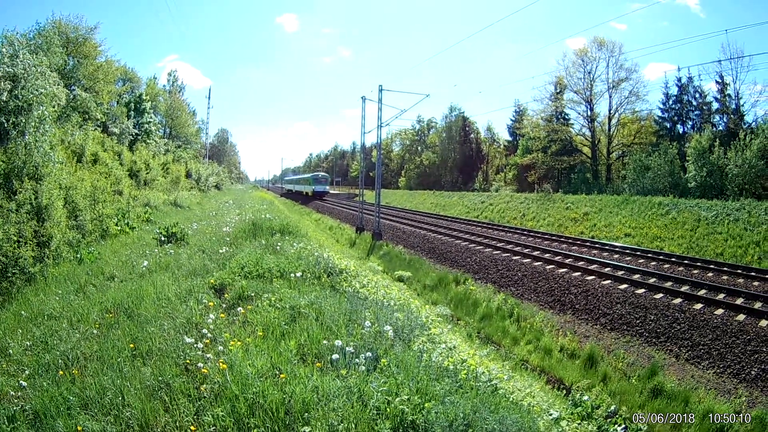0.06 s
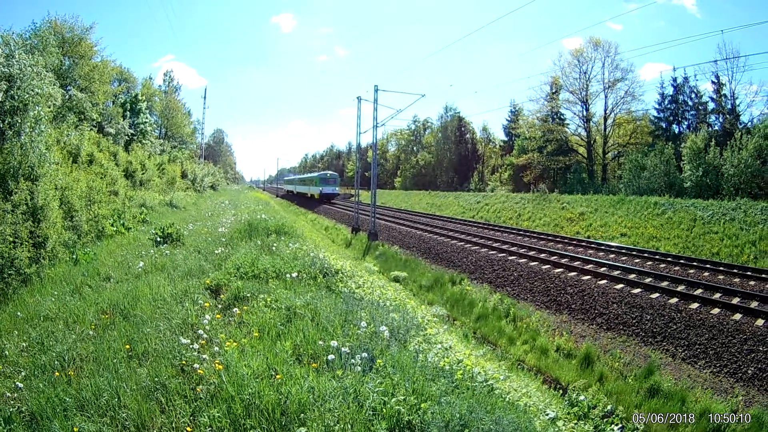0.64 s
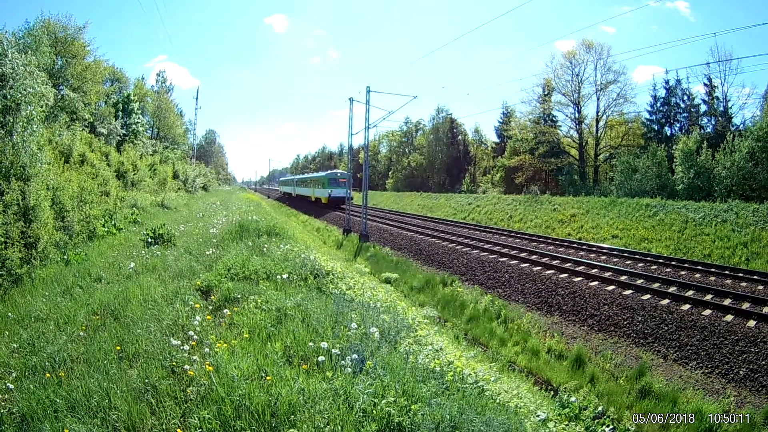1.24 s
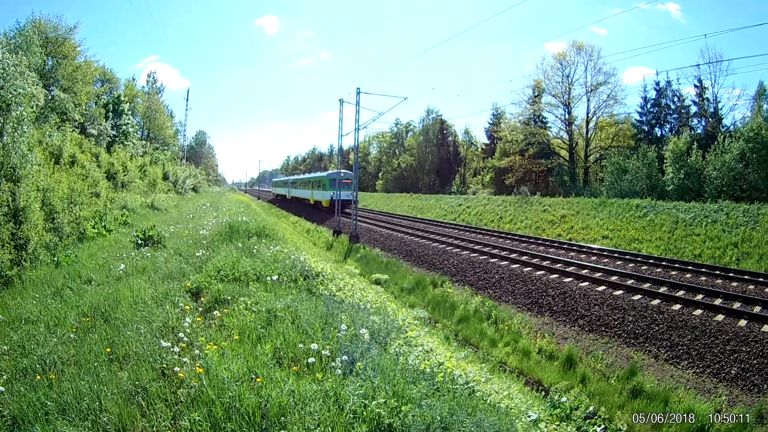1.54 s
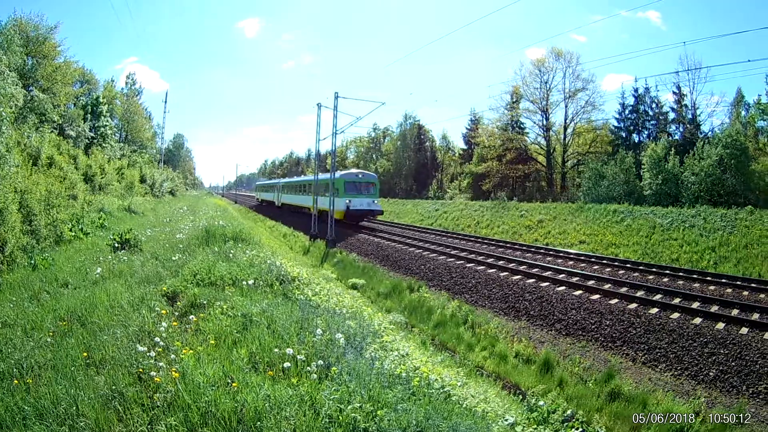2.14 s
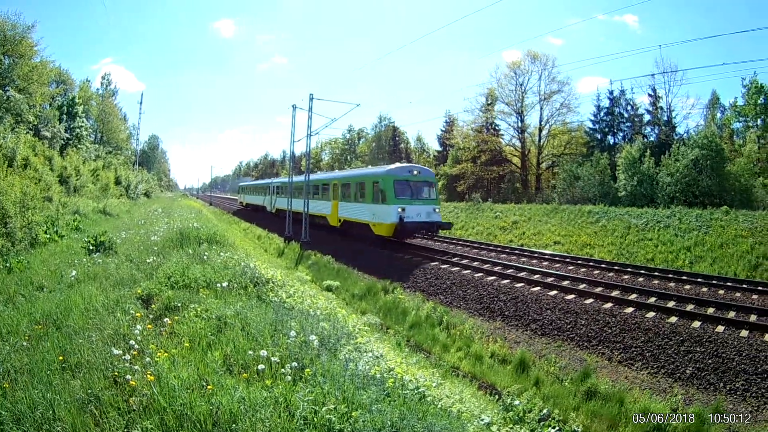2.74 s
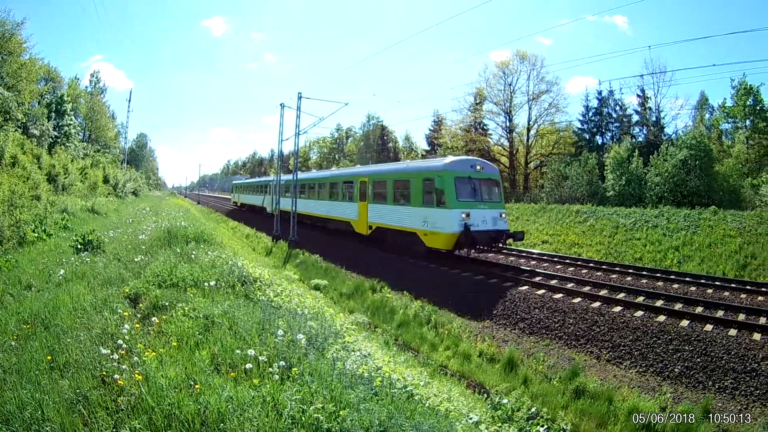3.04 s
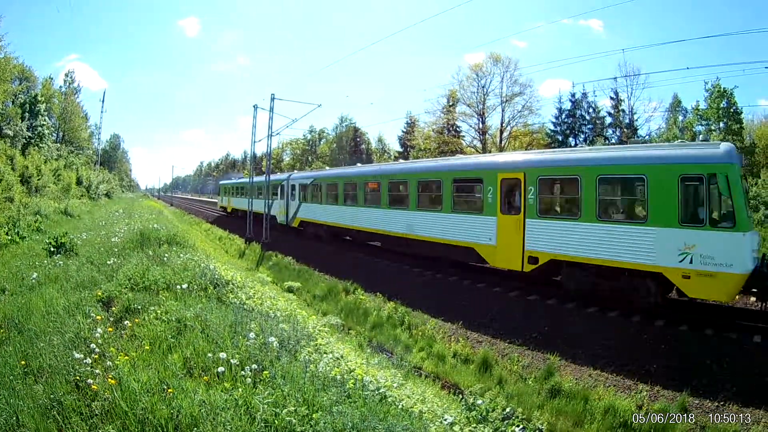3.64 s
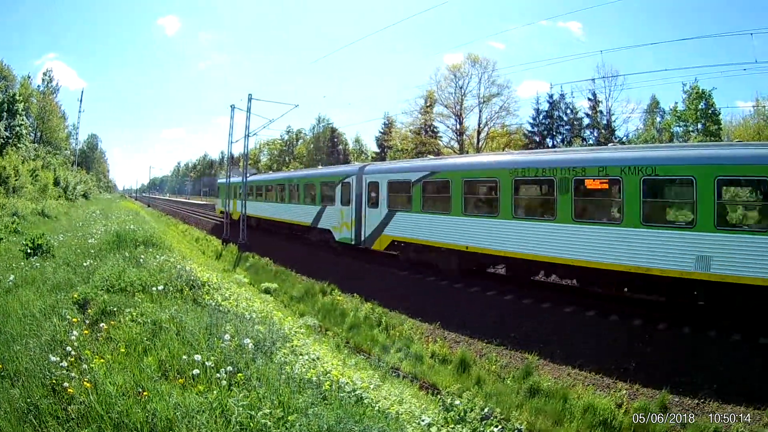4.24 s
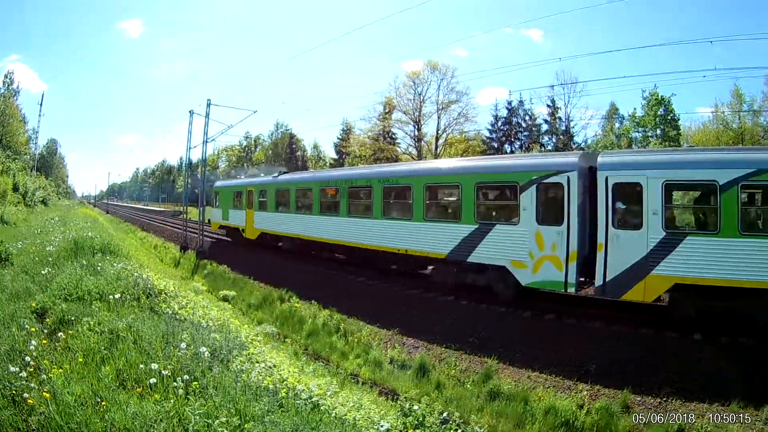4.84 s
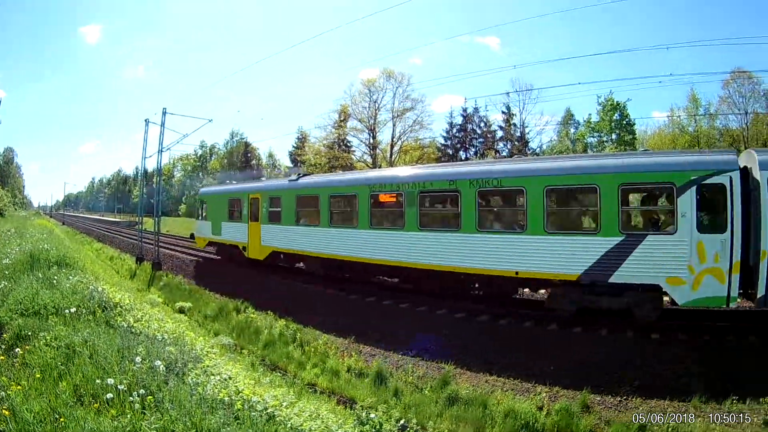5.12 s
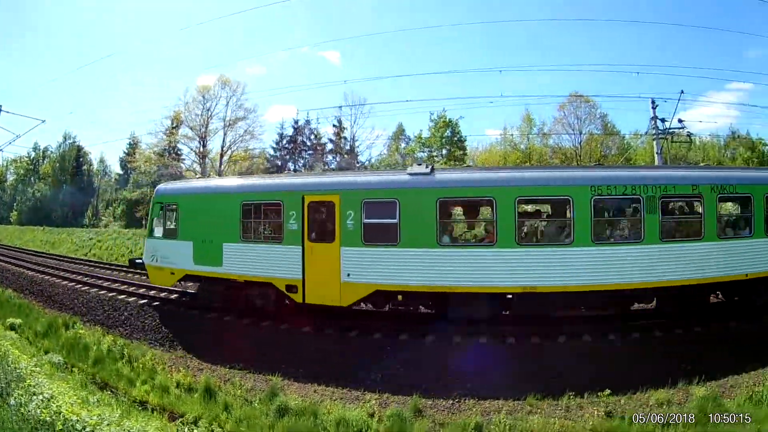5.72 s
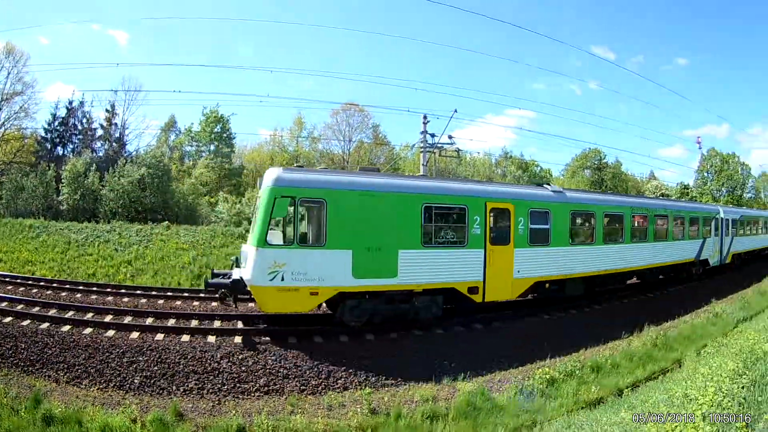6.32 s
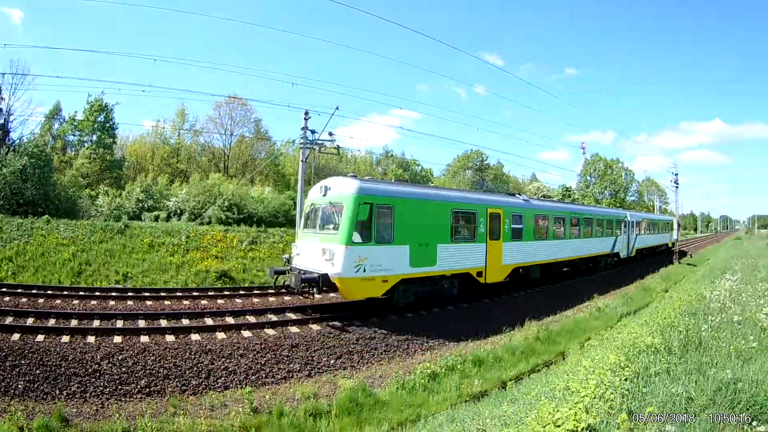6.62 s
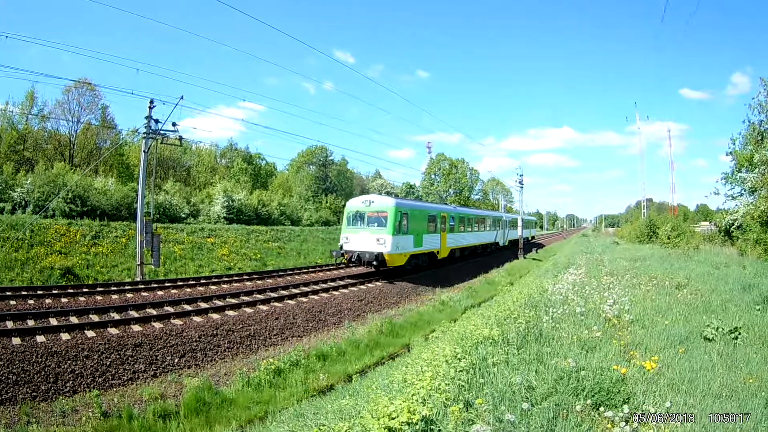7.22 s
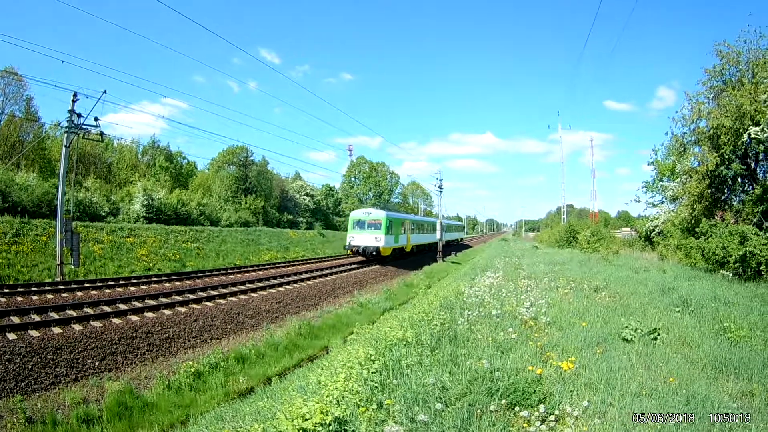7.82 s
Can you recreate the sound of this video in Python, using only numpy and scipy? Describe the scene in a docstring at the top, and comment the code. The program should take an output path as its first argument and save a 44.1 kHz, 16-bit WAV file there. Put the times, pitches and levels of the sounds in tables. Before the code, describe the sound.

A two-car diesel train approaches and passes close by, wheels roaring on the rails and engines droning and rattling, then fades away.

```python
"""On open track, a two-car diesel railcar passes close by at an even speed. Each car has a six-cylinder engine:
the two drones sink in pitch one after the other and beat together. Steel wheels roar and ring on the rails,
sleepers and car bodies rumble, grit hisses at the contact. The front engine ticks once a turn, the rear one
rattles six times a turn, and a rush of cooling air follows each. A low breeze lies under it all."""
import sys
import numpy as np
from scipy import signal
from scipy.fft import rfft, irfft, next_fast_len
from scipy.io import wavfile

SR = 44100
rng = np.random.default_rng(int(sys.argv[2]) if len(sys.argv) > 2 else 0)


def to_wav(s):
    """Save 16-bit WAV."""
    ch = np.atleast_2d(s).T  # columns
    pcm = np.round(np.clip(ch, -1, 1) * 32767)  # PCM
    wavfile.write(sys.argv[1], SR, pcm.astype(np.int16))


N = 355887
T = np.arange(N) / SR
TRAIN_M_S, SOUND_M_S = 16.266, 343

# the engines: (time abreast [s], shaft speed [Hz], distance from the microphone [m])
FRONT, REAR = (4.2825, 17.652, 11.54), (5.901, 18.3782, 9.14)
# swells and lulls of the running gear: (time [s], half length [s], roar [dB], rumble [dB], hiss [dB])
GEAR_SWELLS = [(1.0, .55, 1.2, 0, 0), (3.8, .25, .7, 3.0, 2.5), (4.82, .12, .3, 3.5, 0),
               (4.98, .09, -1.6, -2.0, -.5), (5.24, .09, 1.0, 0, 0), (5.62, .15, 1.0, 5.0, .5),
               (6.25, .18, 0, 0, 2.5), (7.05, .25, 1.5, 3.0, 1.0)]


def amp(db):
    """Decibels to gain."""
    return np.exp(np.asarray(db) * (np.log(10) / 20))


def unit(x):
    """Scales to rms 1."""
    return x / np.sqrt(np.mean(x ** 2) + 1e-20)


def colour(x, points):
    """Filters by an EQ curve drawn on a log-frequency axis."""
    hz, db = np.transpose(points)
    size = next_fast_len(N, True)
    bins = np.fft.rfftfreq(size, 1 / SR)
    gain = amp(np.interp(np.log(bins + 1), np.log(hz + 1), db))
    return irfft(rfft(x, size) * gain, size)[:N]


def noise(points):
    """Noise of rms 1 with the given spectrum."""
    return unit(colour(rng.standard_normal(N), points))


def wander(rate_hz):
    """Smooth random drift of rms 1, up to about the given rate."""
    size = 4096
    bins = np.fft.rfftfreq(size, T[-1] / size)
    slow = irfft(rfft(rng.standard_normal(size)) / (1 + (bins / rate_hz) ** 2))
    return np.interp(T, np.linspace(0, T[-1], size), unit(slow))


def swell(at_s, half_s, t=T):
    """A bell-shaped fade from 0 to 1 and back."""
    return np.exp(-np.minimum(((t - at_s) / half_s) ** 2, 20))


def swells(rows, column):
    """Gain from one dB column of a table of swells or dips."""
    t = T[::64]
    return np.interp(T, t, amp(sum(row[column] * swell(row[0], row[1], t) for row in rows)))


def passing(peak_s, reach_m, peak_db, ahead_db, behind_db):
    """Pass-by gain: each doubling of distance costs ahead_db coming and behind_db going."""
    doublings = np.log2(1 + (TRAIN_M_S * (T - peak_s) / reach_m) ** 2) / 2
    return amp(peak_db - doublings * np.where(T < peak_s, ahead_db, behind_db))


def rolling_gain():
    """Loudness of wheels on rails: one pass, with bumps and swells on top."""
    # pass-by: (time [s], reach [m], peak [dB], fall ahead [dB/doubling], fall behind [dB/doubling])
    rolling_pass = (5.27, 23.7, -16.2, 13.6, 14.4)
    # bumps over uneven rail: (time [s], lift [dB])
    rail_bumps = [(.9, 3.0), (1.39, 3.0), (2.83, 2.5), (2.915, 4.5), (2.975, 3.0), (3.195, 3.5),
                  (3.26, 3.5), (3.91, 3.5), (5.185, 1.5)]
    bumps = [(at_s, .017, db) for at_s, db in rail_bumps]
    return passing(*rolling_pass) * swells(bumps, column=2) * swells(GEAR_SWELLS, column=2)


def roar(flutter_db):
    """Rough steel rolls on steel; the colour turns as the cars show their front, side and back."""
    # the roar from four angles: (frequency [Hz], level [dB])
    far = [(210, -39), (350, -28.5), (430, -8.5), (522, -7.5), (604, 1), (686, -5.5), (742, 1), (802, -8.5),
           (1000, -6.5), (1140, -12), (1530, -13.5), (1870, -25), (2580, -33.5), (2880, -32), (3600, -50.5),
           (4680, -83), (7920, -120)]
    nearing = [(210, -44.5), (350, -24), (393, -10), (460, -6.5), (576, 3.5), (713, -3.5), (779, -0.5),
               (826, 0.5), (893, -0.5), (1070, -4), (1260, -4), (1370, -7.5), (1800, -13), (2280, -21.5),
               (3600, -38.5), (4680, -73), (7920, -120)]
    abreast = [(210, -66), (350, -20.5), (405, -5.5), (460, -6.5), (666, -1), (727, -0.5), (786, 0.5),
               (850, -4), (946, 1.5), (1000, -5), (1320, -2), (1510, -9.5), (1770, -6.5), (3020, -30),
               (3600, -40), (4680, -64), (7920, -120)]
    leaving = [(210, -44), (350, -15), (397, -18), (488, 1.5), (699, 0), (756, -3), (810, -1), (1020, -4.5),
               (1120, -2), (1480, -10.5), (1600, -5), (1970, -14), (2210, -15), (2820, -37), (3600, -30),
               (4680, -61), (7920, -120)]
    # crossfade points: (far [s], nearing [s], abreast from [s], abreast until [s], leaving [s])
    fade_times = [1.2, 3.9, 5.1, 5.9, 6.9]
    colours = [far, nearing, abreast, abreast, leaving]
    shares = [np.interp(T, fade_times, row) for row in np.eye(len(colours))]
    rolling = sum(np.sqrt(share) * noise(points) for share, points in zip(shares, colours))
    return rolling_gain() * amp(flutter_db * wander(18)) * rolling


def resonance(hz, width_hz):
    """A gliding resonance stirred at random, rms about 1."""
    sway = wander(width_hz / 2) + 1j * wander(width_hz / 2)
    return (sway * np.exp(2j * np.pi * np.cumsum(hz) / SR)).real


def wheel_ring(abreast_s, sweep_s, swell_db, whine_db, whine_width_hz):
    """Wheels and rails ring, sinking in pitch as they go by; a thin whine rises and falls."""
    # wheel and rail modes at rest: (frequency [Hz], width [Hz], level against the roar [dB])
    modes = [(588.7, 61, -16.5), (1726, 56, -34), (2740, 150, -37.5)]
    # whine of the running gear: (time [s], pitch [Hz])
    whine_pitch = [(0, 730), (2, 767), (4, 781), (5.7, 806.4), (6.3, 788), (8.07, 765)]
    doppler = 1 - TRAIN_M_S / SOUND_M_S * (T - abreast_s) / np.hypot(T - abreast_s, sweep_s)
    ring = sum(amp(db + swell_db * wander(2)) * resonance(hz * doppler, width) for hz, width, db in modes)
    whine_hz = np.interp(T, *np.transpose(whine_pitch))
    fade = np.interp(T, [6.2, 7], [1, .2])
    whine = amp(whine_db) * fade * resonance(whine_hz, whine_width_hz)
    return rolling_gain() * (ring + whine)


def undercarriage(grit_db):
    """Sleepers and car bodies rumble; grit at the wheel contact hisses and, from close by, fizzes."""
    # low, high and top layers: (frequency [Hz], level [dB])
    rumble_eq = [(18, -34), (35, -9.5), (70, -1), (150, -7), (270, 0), (380, -3.5), (520, -1.5),
                 (1000, -61.5)]
    hiss_eq = [(2000, -36), (3100, 3.5), (4000, 4), (5400, 1), (6200, -4), (7200, -9), (8200, -17.5),
               (10000, -51.5)]
    fizz_eq = [(6500, -28), (8400, 1), (10000, 0.5), (11200, 0.5), (12300, -16), (13300, -27.5),
               (15000, -26), (16000, -21)]
    # pass-bys: (time [s], reach [m], peak [dB], fall ahead [dB/doubling], fall behind [dB/doubling])
    rumble_pass = (5.1, 26.7, -28.3, 18.3, 24.5)
    hiss_pass = (5.25, 15.5, -40.2, 15.2, 13.6)
    fizz_pass = (5.25, 17.0, -58.6, 16.3, 16.5)
    rumble = passing(*rumble_pass) * swells(GEAR_SWELLS, column=3) * noise(rumble_eq)
    grit = passing(*hiss_pass) * noise(hiss_eq) + passing(*fizz_pass) * noise(fizz_eq)
    return rumble + swells(GEAR_SWELLS, column=4) * amp(grit_db * wander(96)) * grit


def shaft(engine):
    """Shaft turns as heard after the travel time of sound, and nearness (1 when abreast)."""
    abreast_s, shaft_hz, gap_m = engine
    distance = np.hypot(gap_m, TRAIN_M_S * (T - abreast_s))
    return shaft_hz * (T - abreast_s - (distance - gap_m) / SOUND_M_S), gap_m / distance


def exhaust(engine, boom_pass, drone_pass, overtones, firing_db, waver_db, jitter_turns):
    """Firing note, boom and drone on multiples of the shaft speed, each wavering in the moving air."""
    # brief dips in the note: (time [s], half length [s], boom [dB], drone [dB])
    dips = [(2.4, .25, -2.5, 0), (3.05, .3, 0, -4.5), (4.19, .08, -10.0, 0), (4.62, .1, -5.0, -2.5),
            (5.3, .2, -5.0, -1.0), (5.73, .08, -3.0, 0), (6.27, .12, -3.0, 0), (6.92, .22, 0, -4.5)]
    turns, nearness = shaft(engine)
    turns = turns + jitter_turns * wander(5.5)
    firing = amp(firing_db) * nearness ** 0.95
    boom = passing(*boom_pass) * swells(dips, column=2)
    drone = passing(*drone_pass) * swells(dips, column=3)
    partials = [(3, firing), (6, boom), (12, drone)]
    partials += [(order, drone * amp(db)) for order, db in overtones]
    return np.sqrt(2) * sum(level * amp(waver_db * wander(1)) * np.cos(2 * np.pi * order * turns)
                            for order, level in partials)


def diesels():
    """Two exhausts at slightly different speeds beat against each other."""
    # pass-bys: (time [s], reach [m], peak [dB], fall ahead [dB/doubling], fall behind [dB/doubling])
    front_boom = (4.2, 11.5, -23.8, 6.9, 8.2)
    front_drone = (4.1, 12.5, -32.5, 8.7, 11.0)
    rear_boom = (5.6, 25.0, -28.0, 18.0, 9.0)
    rear_drone = (5.78, 11.5, -27.0, 11.3, 8.8)
    # other exhaust partials: (order [cycles per turn], level against the drone [dB])
    front_tones = [(6.5, -20.5), (7, -13), (8, -18.5), (9, -4.7), (10, -15), (13, -22.5), (15, -28),
                   (18, -22), (21, -16)]
    rear_tones = [(6.5, -14), (7, -8), (9, -11), (10, -14), (13, -12), (15, -12), (18, -13), (20, -16),
                  (22, -18), (24, -19)]
    front = exhaust(FRONT, front_boom, front_drone, front_tones,
                    firing_db=-36.3, waver_db=.6, jitter_turns=.0015)
    rear = exhaust(REAR, rear_boom, rear_drone, rear_tones,
                   firing_db=-43, waver_db=1.0, jitter_turns=.0017)
    return front + rear


def breeze(level_db):
    """A low, steady bed of open air."""
    # moving air: (frequency [Hz], level [dB])
    air_eq = [(15, -26), (38, 3), (70, 3), (150, -0.5), (320, -35.5), (1000, -50.5)]
    return amp(level_db) * noise(air_eq)


def ticking(tick_s, decay_s, floor):
    """The front engine's envelope: one sharp burst a turn, one of them peaking near tick_s."""
    turns = shaft(FRONT)[0]
    age = (turns - np.interp(tick_s - .003, T, turns)) % 1 / FRONT[1]
    onset = 1 - np.exp(-age / .0015)
    return unit(floor + onset * np.exp(-age / decay_s))


def rattle(decay_s):
    """The rear engine's envelope: injectors and valves knock six times a turn, unevenly."""
    count = 6 * shaft(REAR)[0]
    age = count % 1 / (6 * REAR[1])
    strong_weak = 1 + .25 * np.cos(np.pi * np.floor(count))
    onset = 1 - np.exp(-age / .0008)
    return unit(strong_weak * amp(1.3 * wander(40)) * onset * np.exp(-age / decay_s))


def clatter(front_sizzle_db, rear_sizzle_db):
    """Ticks and knocks ring the engine blocks; the rear one stays hidden until nearly abreast."""
    # ring of each block and the close-up sizzle: (frequency [Hz], level [dB])
    front_block = [(1500, -27.5), (3500, -14), (3900, 5), (4120, -2), (4370, 4), (4720, -5.5), (5050, 0),
                   (5600, -14), (6900, -12.5), (9000, -32), (14000, -52.5)]
    rear_block = [(1500, -25), (3550, -12), (4000, 0), (4230, 4), (4700, -2), (5400, -25), (6100, -9),
                  (7200, -15), (9000, -34), (12000, -48)]
    sizzle_eq = [(6000, -30), (7200, 6), (8600, -4), (9800, -11), (11300, -3), (12400, -8), (13400, -26),
                 (15000, -26), (16000, -40)]
    # pass-bys: (time [s], reach [m], peak [dB], fall ahead [dB/doubling], fall behind [dB/doubling])
    front_pass = (4.4, 4.9, -41.0, 11.0, 8.4)
    rear_pass = (5.58, 6.0, -36.0, 27.0, 9.3)
    ticks, knocks = ticking(tick_s=4.337, decay_s=0.013, floor=0.15), rattle(decay_s=0.0077)
    front = passing(*front_pass) * ticks * noise(front_block)
    rear = passing(*rear_pass) * knocks * noise(rear_block)
    # the top end only escapes straight out from under each car
    sizzle = amp(front_sizzle_db) * swell(4.4, .25) * ticks
    sizzle += amp(rear_sizzle_db) * swell(5.95, .45) * knocks
    return front + rear + sizzle * noise(sizzle_eq)


def ringing_parts():
    """Each bogie, and higher-pitched parts too, rings in its own band while it faces the microphone."""
    # ringing bands: (time [s], half length [s], frequency [Hz], width [Hz], level [dB])
    bogies = [(3.92, .06, 800, 130, -30.0), (4.822, .08, 890, 150, -24.5), (5.21, .082, 880, 200, -21.5),
              (6.03, .061, 807, 40, -19.5)]
    high_flares = [(4.24, .15, 1350, 300, -28.5), (5.15, .17, 5600, 550, -45.5),
                   (5.4, .31, 1760, 140, -26.5), (5.6, .3, 11500, 700, -60), (6.65, .2, 11900, 710, -73),
                   (6.8, .5, 4400, 380, -50.5), (7.204, .21, 1710, 150, -34)]
    ringing = np.zeros(N)
    for at_s, half_s, hz, width, db in [*bogies, *high_flares]:
        band = [(max(hz - 4 * width, 0), -120), (hz - width, -11), (hz, 0),
                (hz + width, -11), (hz + 4 * width, -120)]
        ringing += amp(db) * swell(at_s, half_s) * noise(band)
    return ringing


def fans(front_db, rear_db):
    """A rush of cooling air goes by with each engine."""
    # cooling fans close up: (frequency [Hz], level [dB])
    fan_eq = [(1200, -29), (2000, 0), (2700, 7), (3300, -1), (3900, -23), (6000, -49.5)]
    return (amp(front_db) * swell(4.56, 0.35) + amp(rear_db) * swell(5.85, 0.48)) * noise(fan_eq)


def scene():
    """The running gear, both engines and the open air, in mono."""
    wheels = roar(flutter_db=0.4) + undercarriage(grit_db=1.7) + ringing_parts()
    wheels += wheel_ring(abreast_s=6.0, sweep_s=1.5, swell_db=3.0, whine_db=-12, whine_width_hz=11)
    engines = diesels() + clatter(front_sizzle_db=-65, rear_sizzle_db=-56.5)
    engines += fans(front_db=-38, rear_db=-37.7)
    return (wheels + engines + breeze(level_db=-53.5))[None]


def record(dry):
    """The microphone's notches, its own faint hiss, and a steep high cut."""
    # narrow treble notches: (frequency [Hz], gain [dB])
    notches = [(7350, 0), (7680, -7.5), (7920, -26.5), (8150, -16.5), (8450, -1.5), (12600, -1.5),
               (13400, -14), (14000, -2.5), (15700, -4.5)]
    heard = colour(dry[0], notches) + amp(-79.5) * rng.standard_normal(N)
    high_cut = signal.firwin(511, 15750, window=("kaiser", 9), fs=SR)
    return signal.oaconvolve(heard, high_cut, "same")[None]


dry = scene()
out = record(dry)
to_wav(out)
```